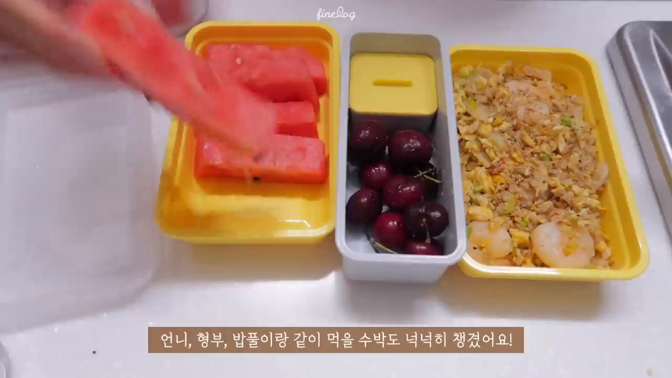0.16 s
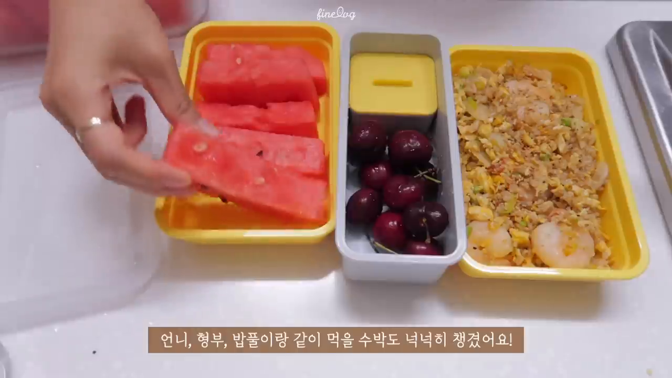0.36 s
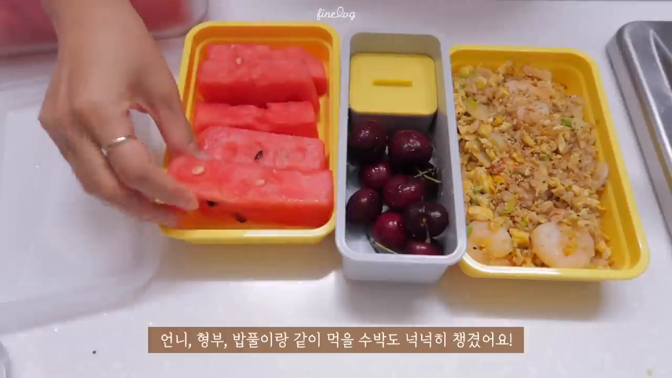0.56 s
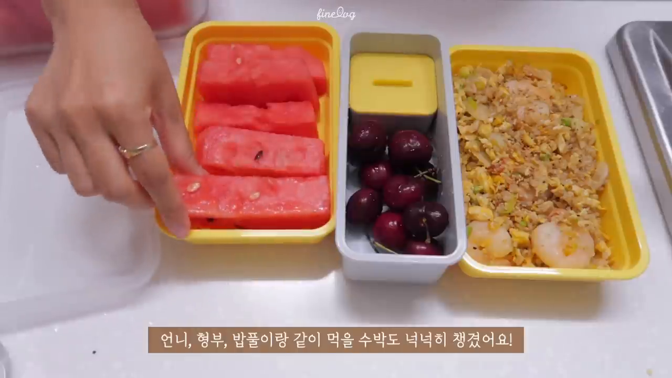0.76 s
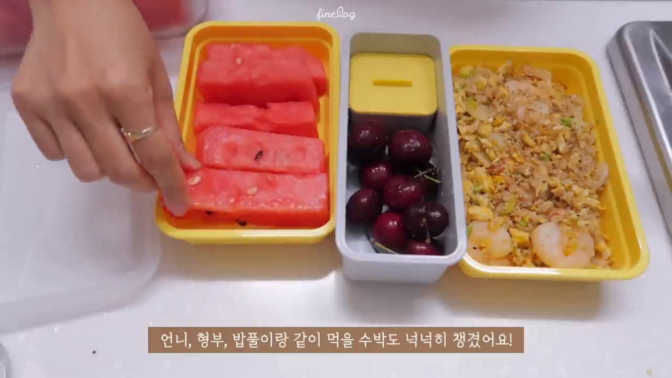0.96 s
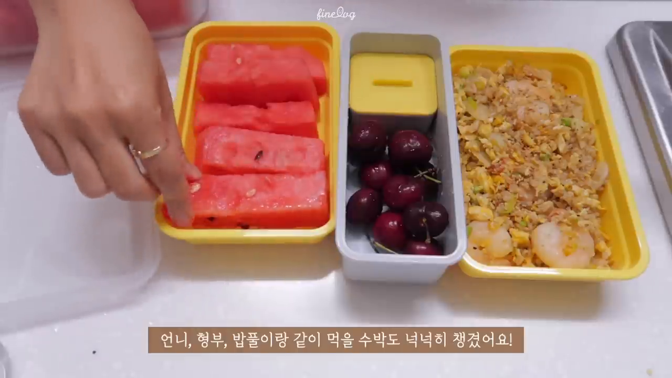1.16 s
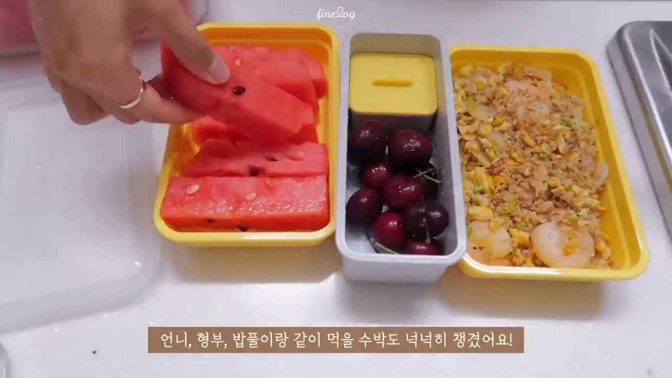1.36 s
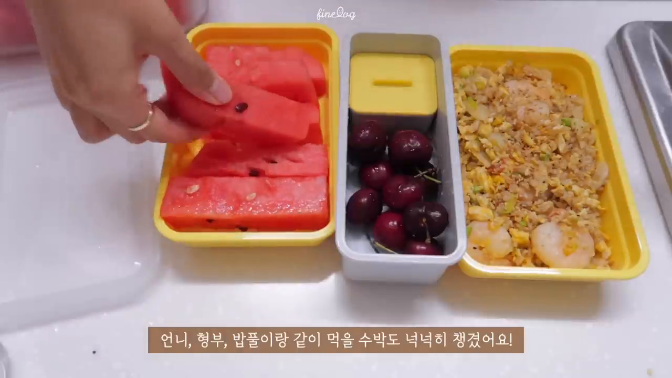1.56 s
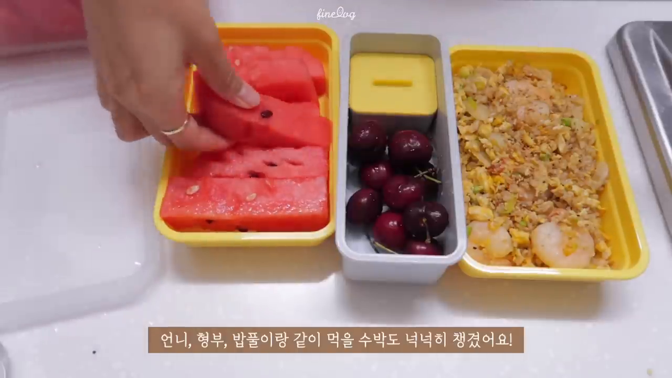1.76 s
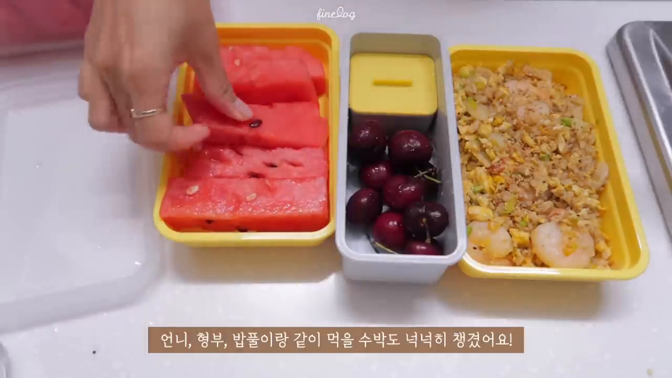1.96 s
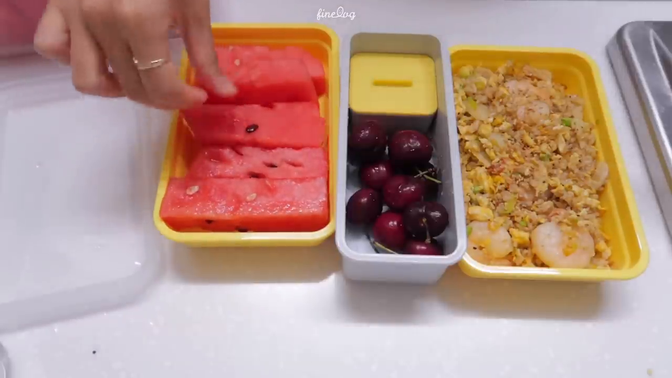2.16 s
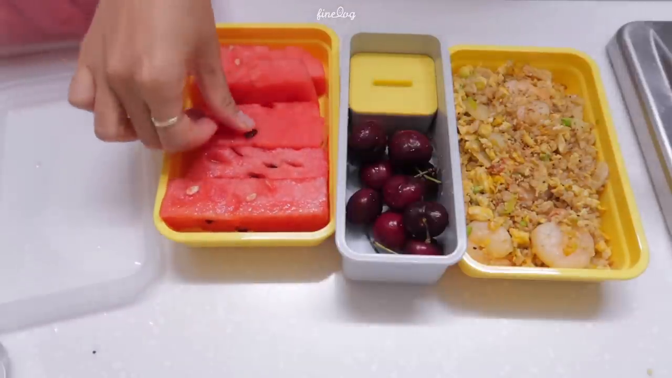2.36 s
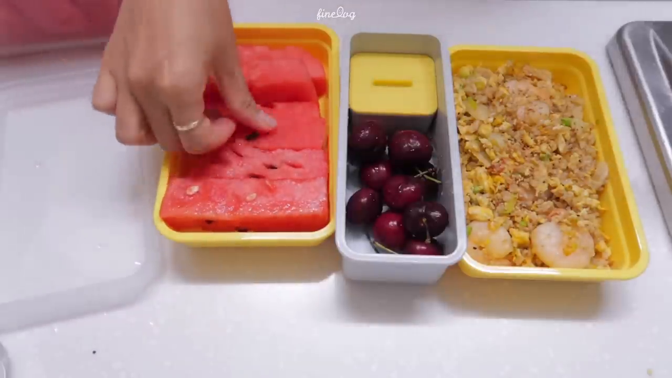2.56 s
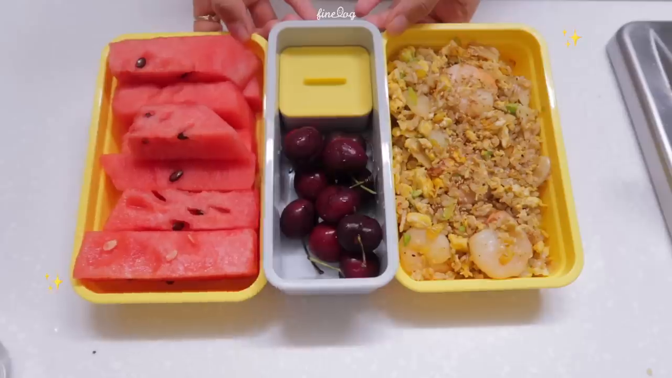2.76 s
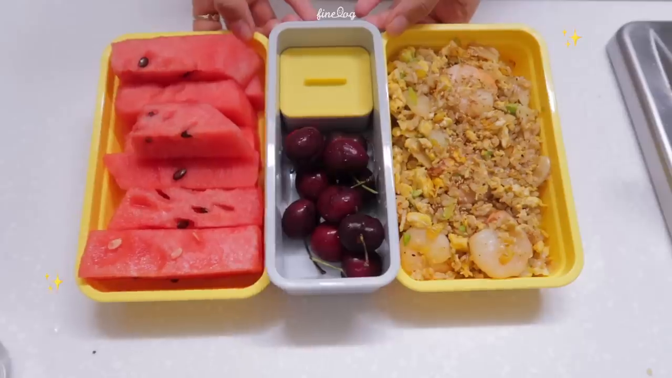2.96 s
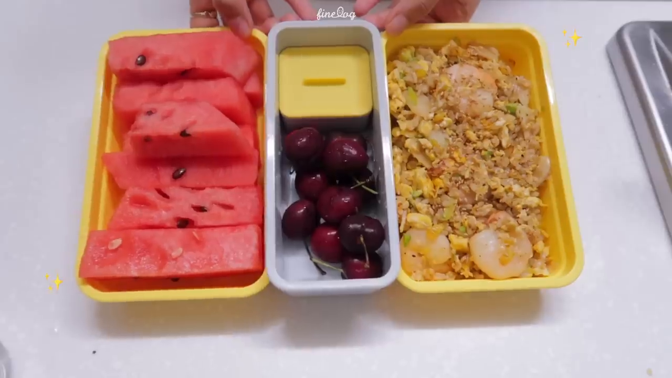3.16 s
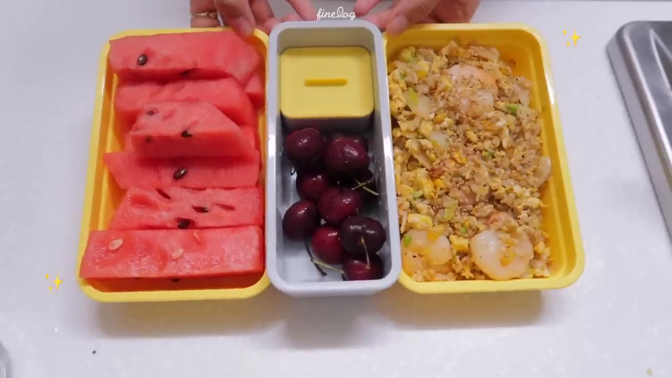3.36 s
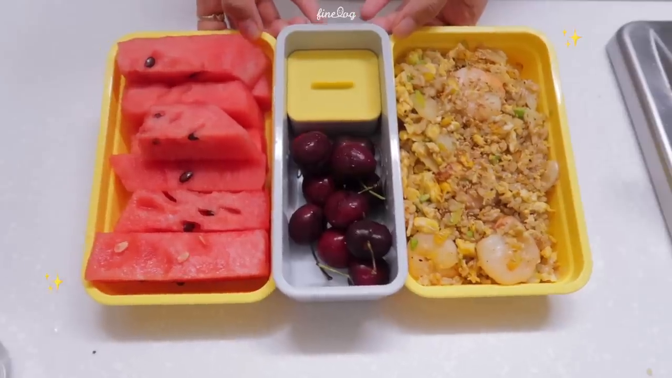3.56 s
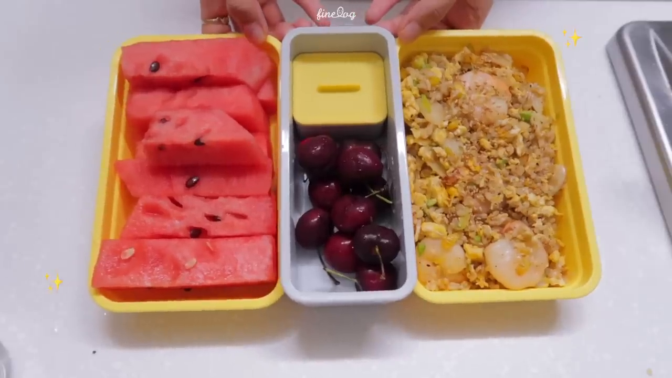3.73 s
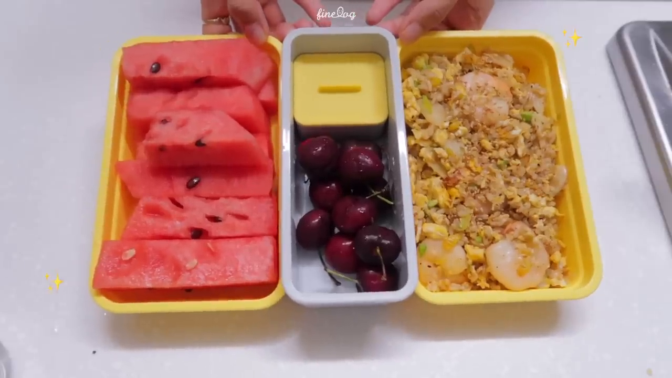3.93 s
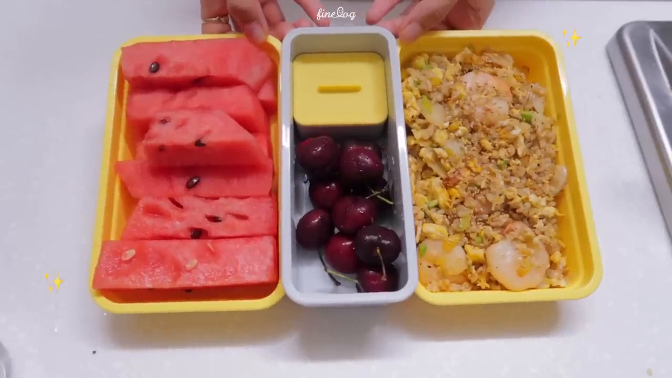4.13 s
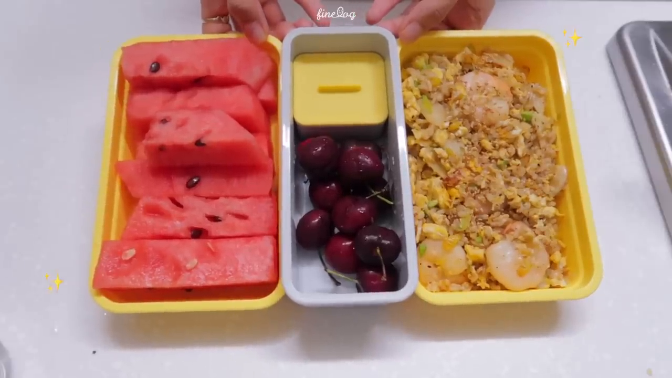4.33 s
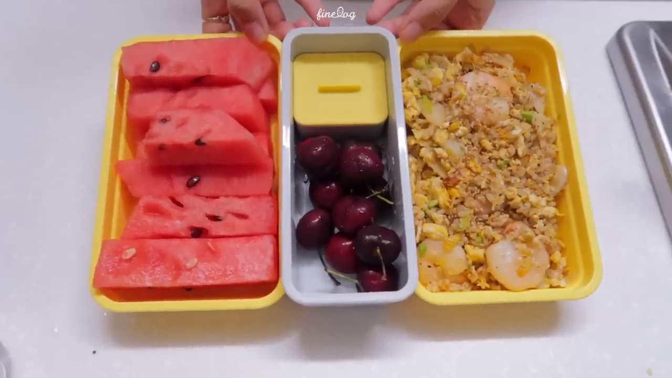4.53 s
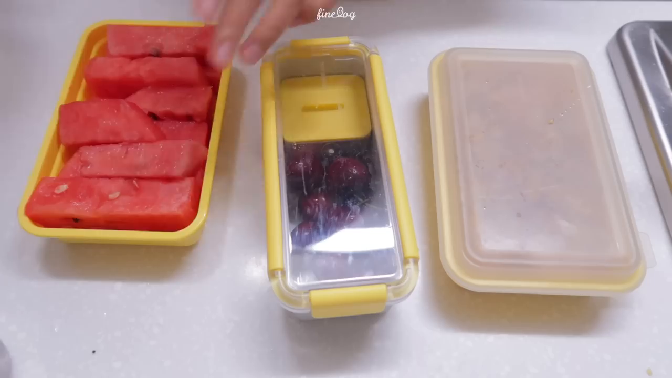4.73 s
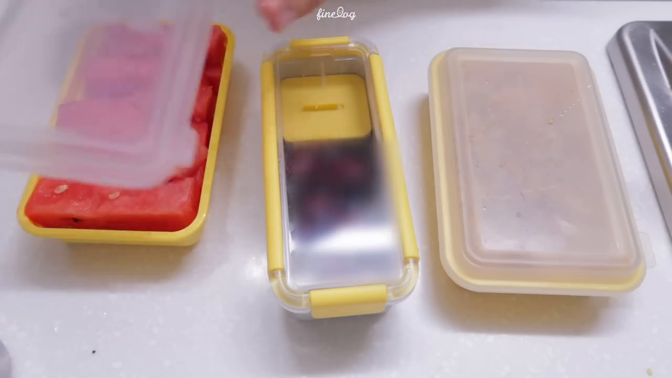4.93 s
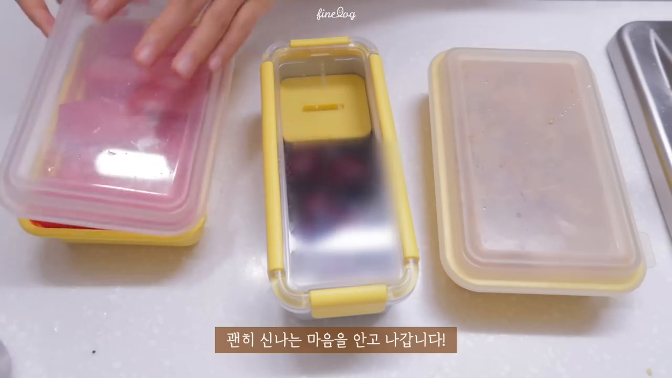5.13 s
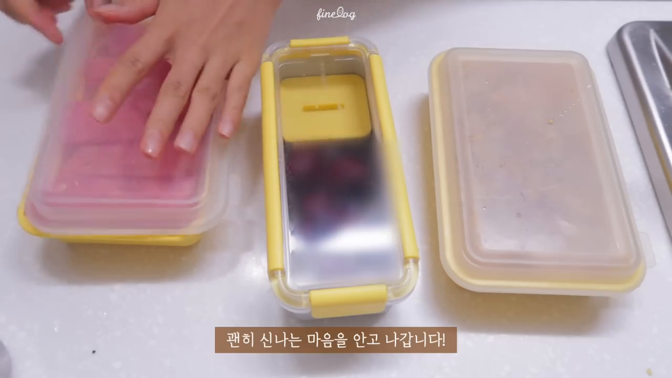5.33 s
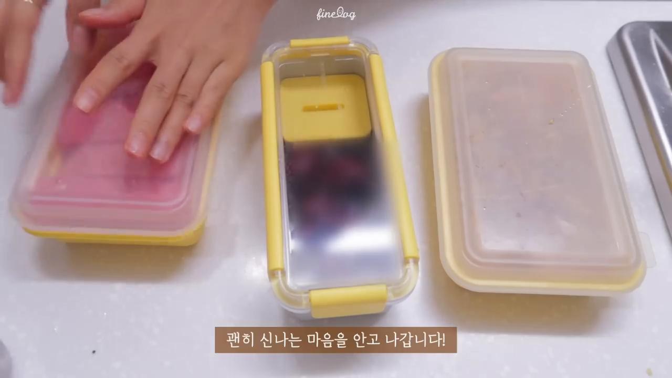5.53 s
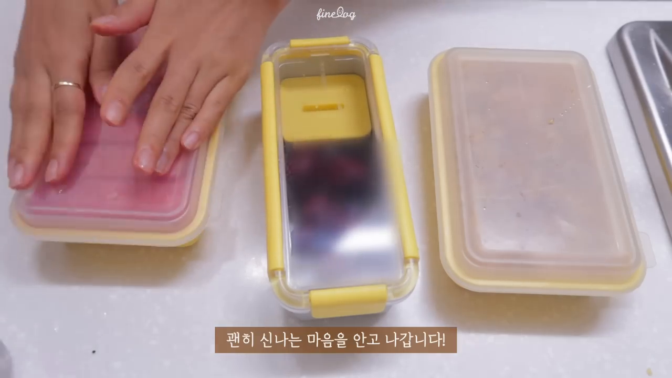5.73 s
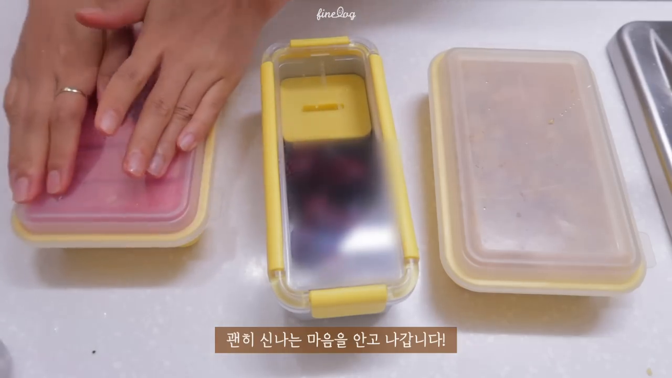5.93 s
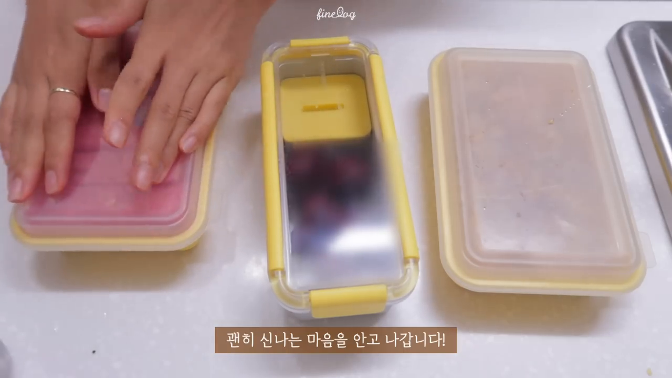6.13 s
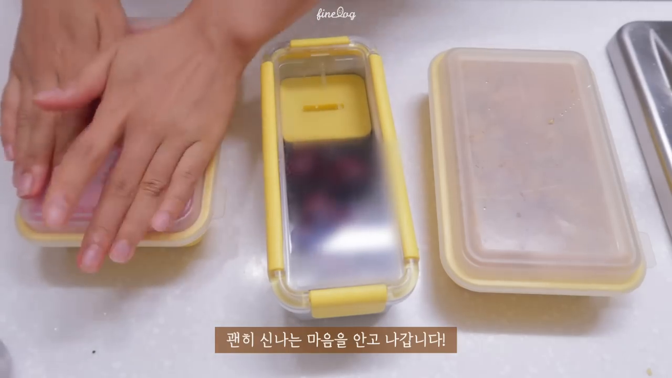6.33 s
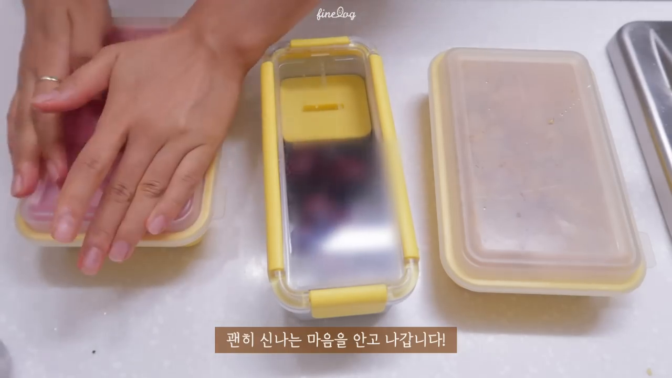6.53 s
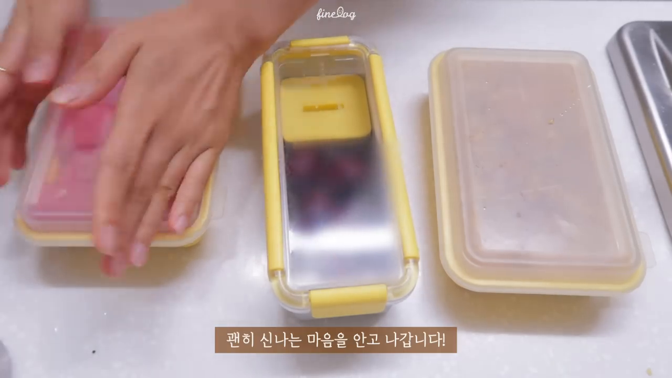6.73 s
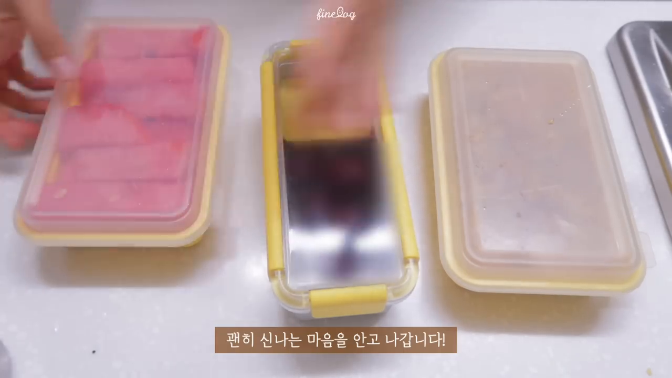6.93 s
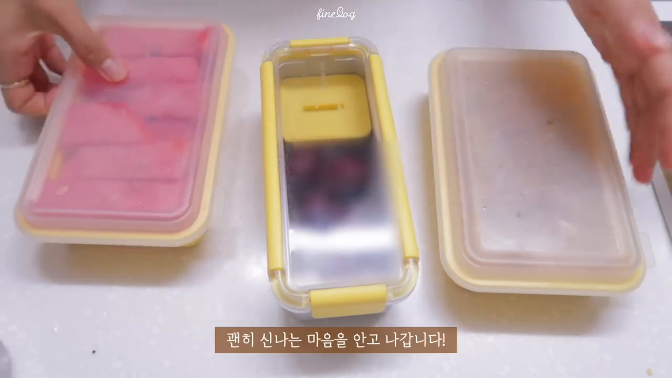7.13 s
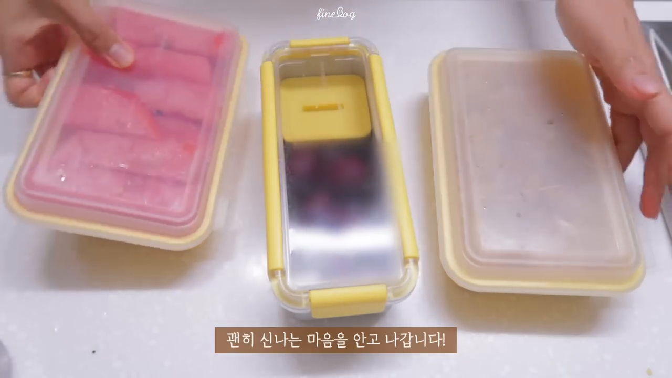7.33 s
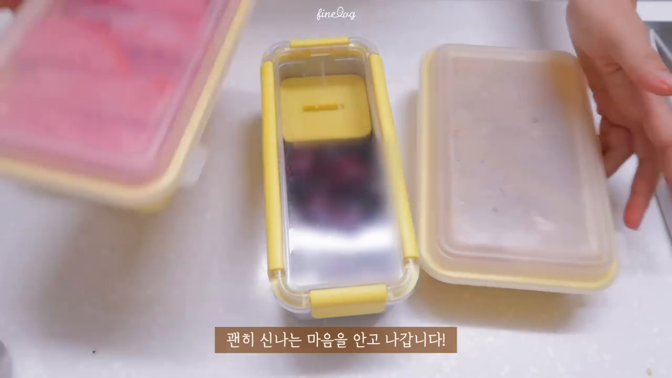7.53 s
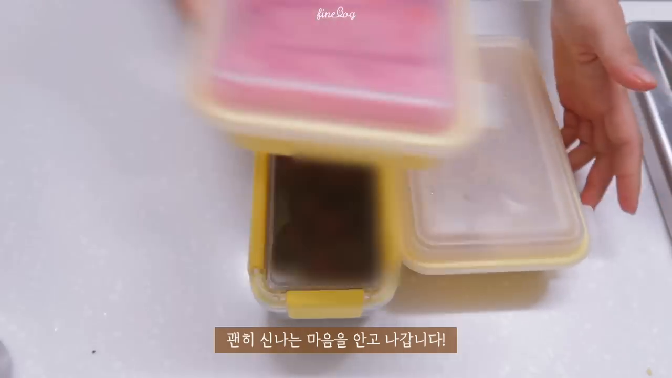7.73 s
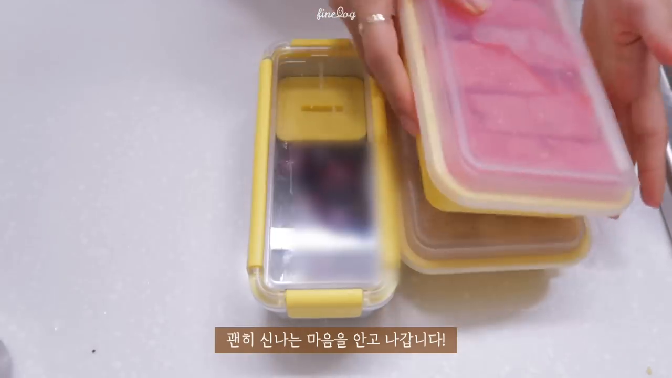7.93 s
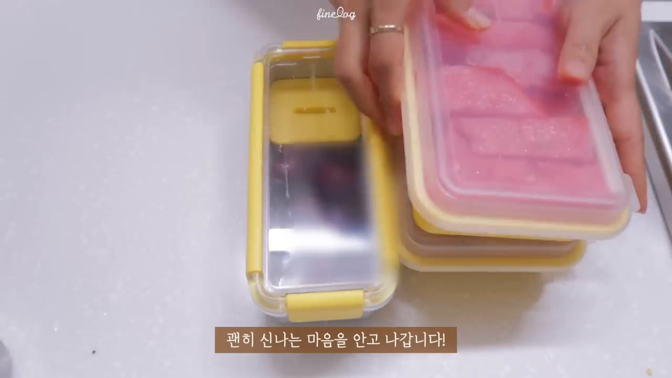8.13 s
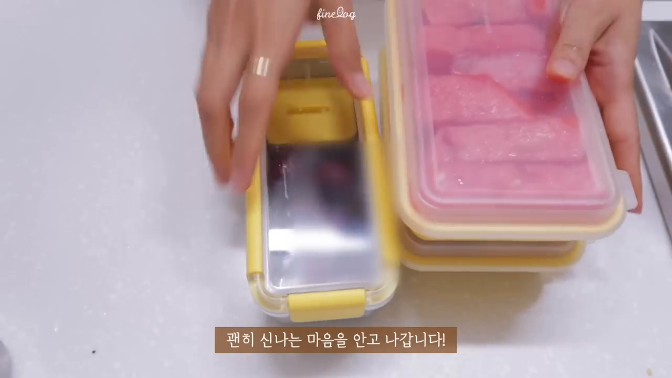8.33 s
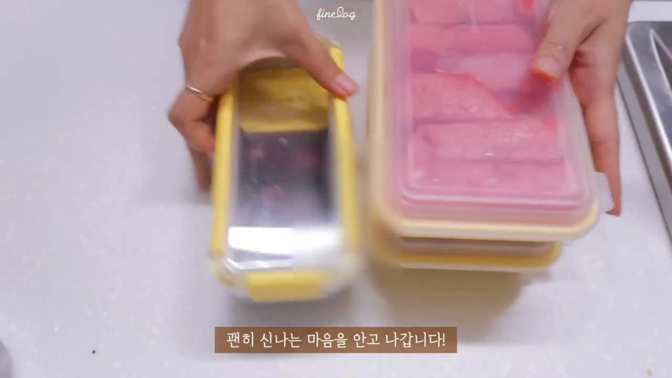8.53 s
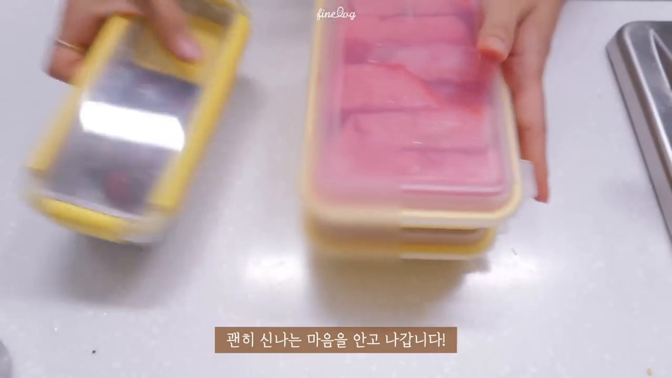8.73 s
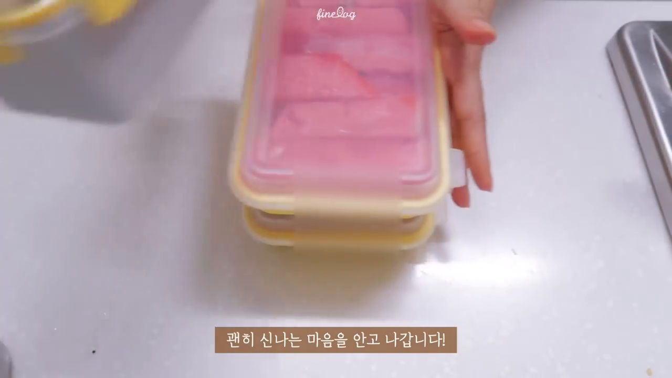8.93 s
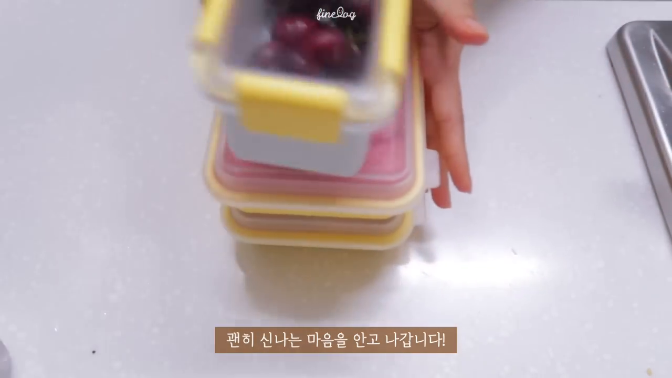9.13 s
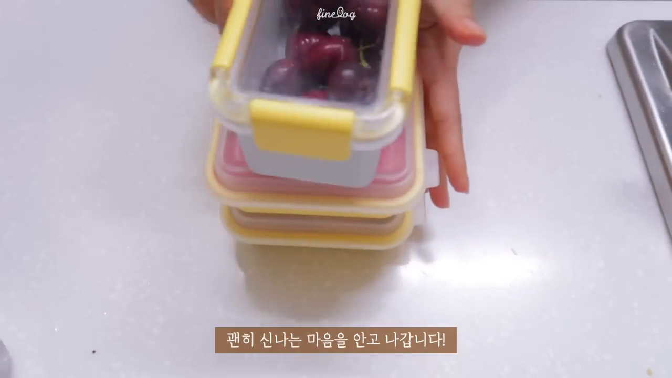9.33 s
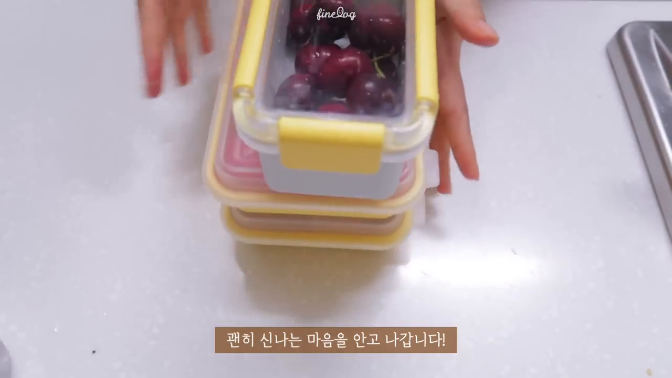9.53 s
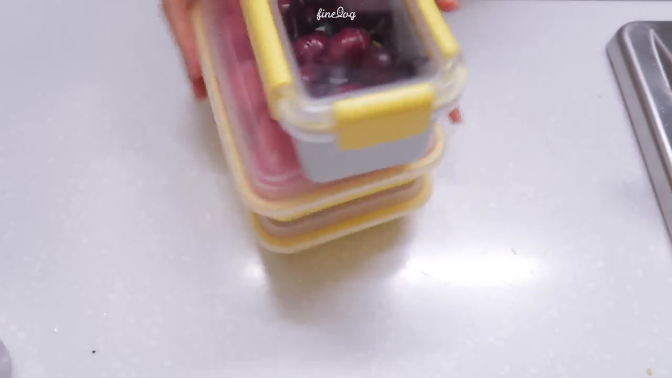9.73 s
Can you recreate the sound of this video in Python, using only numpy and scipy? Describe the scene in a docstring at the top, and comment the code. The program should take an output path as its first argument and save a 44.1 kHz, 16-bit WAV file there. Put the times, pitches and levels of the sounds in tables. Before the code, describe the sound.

Close kitchen counter: soft wet fruit touches in a plastic tray, then a lid clatters on, squeaks, and boxes knock together in a stack.

```python
"""A kitchen counter with plastic lunch boxes on it, heard up close in stereo. Wet melon slices are tucked into
a tray, a lid clatters on and squeaks as it is pressed home, then boxes are slid about and stacked.
Knocks are built from ringing modes, short noise and a rim crack; rubbing comes from many tiny random slips.
Squeals are gliding tones. Mains hum, a low ventilation rumble, a faint drone and hiss lie behind."""
import sys
import numpy as np
from scipy import signal
from scipy.fft import rfft, irfft, next_fast_len
from scipy.io import wavfile
from scipy.ndimage import uniform_filter1d, map_coordinates

SR = 44100
rng = np.random.default_rng(int(sys.argv[2]) if len(sys.argv) > 2 else 0)


def materialize(psi):
    """Save the field psi as 16-bit PCM at rate SR to the path in sys.argv[1].

    A 1-D psi becomes a single channel; in a 2-D psi each row is a channel.
    """
    bounded = np.clip(np.atleast_2d(psi).T, -1, 1)
    quanta = np.round(bounded * 32767).astype(np.int16)
    wavfile.write(sys.argv[1], SR, quanta)


N = 435708  # length of the scene in samples

# Plastic knocking on plastic. Each row: start in seconds, strength in dB, low thump in dB, hollow sound in dB,
# hardness in dB (raises the crack), pitch the thin wall favours in Hz.
CONTACTS = [(0.384, -39, -8, -9.5, 1.5, 2100), (0.5796, -24, -22, -12, -1, 1920),
            (0.749, -46, 2.5, 4.5, 1, 1360), (1.049, -38.5, -23, -12, 3.5, 2220),
            (1.355, -57, 6, -5, 10.5, 1920), (2.075, -39, -4, -2, 1.5, 1800),
            (2.092, -43, -8, -4, -3, 1950), (2.391, -50, -1, -2, 1, 1650), (2.613, -47, -9, -7, -5, 1940),
            (2.861, -34, -4.5, -2, 1.5, 1910), (5.131, -51, 7, 7.5, 8, 1450),
            (5.188, -22, -8, -3, -4.5, 1370), (5.2624, -19, -11, 2, 4, 1510),
            (5.2949, -23.5, -11, -4.5, 0, 1430), (5.314, -22.5, -13, -3, -13, 1420),
            (5.331, -32, -5.5, 1.5, -7, 1400), (5.419, -21, -11.5, 4, -7.5, 1260),
            (5.495, -40.5, -1, 4, -1, 1500), (5.613, -42.5, -3, -2, 1, 1400),
            (5.66, -34, -9, -1, -16, 1800), (5.683, -35, 2.5, 9.5, -6, 1450),
            (5.694, -29, -1.5, 5, -7, 1600), (5.701, -34, 1, 3, -10, 1800), (5.722, -31, -4, 0, -1.5, 1800),
            (5.727, -35, -2, -2, -5, 1950), (5.7887, -31, -0.5, 7, -5, 1500), (5.797, -37, 2, 2, -4, 1650),
            (5.833, -46.5, 8, 5, -2, 1500), (5.842, -40, 4, 4, -4, 1750), (5.868, -45, 1, 5, -12, 1700),
            (5.8754, -36.5, 5.5, 4, -14, 1480), (6.265, -54.5, 11, 3, -1, 1400),
            (6.331, -48, 11, 2, -11, 1600), (6.3985, -21, 2, 1.5, 4.5, 1780),
            (7.147, -29, -10, -6, 1.5, 2100), (7.1521, -24.5, 2.5, 4, -1.5, 1600),
            (7.393, -38.5, -0.5, 3.5, -5.5, 1400), (7.658, -39.5, 8, 6, -13, 1150),
            (7.669, -38, 10, 10, -4, 1150), (7.984, -12.5, -1.5, -7, -3.5, 1770),
            (8.1442, -31.5, 6, 0, -3, 1620), (8.2815, -17, -4, -3, -1.5, 1730),
            (8.6452, -35, -11, 6.5, -8, 1370), (8.771, -54, -3, 9, -10, 1300),
            (9.097, -53.5, -4, 15, -10, 1200), (9.108, -54, -5, 9, -12, 1210),
            (9.1749, -46, 4, 10, -15, 1204), (9.194, -37.5, 4, -3, -6, 1510),
            (9.207, -34, -3, -4, -5, 1750), (9.224, -14.5, -8, -6.5, 0, 2150),
            (9.231, -26.5, -2, -1, -8, 2000), (9.3252, -18, -4.5, 1.5, -1, 1400),
            (9.347, -32.5, -2, -1, 2.5, 1510), (9.498, -37, 5, 0.5, 2.5, 1760),
            (9.5201, -35.5, -2, 0, -11, 1250), (9.731, -44.5, -4.5, 0, -1, 1555),
            (9.76, -44.5, -6, -4.5, -2, 1720), (9.778, -40.5, -1, -6, -6, 1730),
            (9.825, -32, -0.5, -9, -8, 1600)]
# What the hands work on: open melon tray, lid dropped on, lid pressed home, one full box on another,
# small box on top. Each row: start in seconds, thump pitch in Hz, hollow pitch in Hz, wall focus in dB per octave,
# wall chatter in dB, damping by hands and load in dB per second, room echo in dB,
# left over right in dB, left lead in microseconds.
STAGES = [(0, 170, 640, 8, -6, 0, -11.5, 0, 20), (4.8, 288, 830, 12, -6.5, 89, -11.5, 1, 17),
          (5.55, 295, 820, 11, -7, 300, -11, 0.8, 25), (7.85, 296, 690, 5, -7, 40, -12.5, -1, 30),
          (8.55, 342, 787, 11, -2, 78, -15, 0.5, 29)]
# Ways each object rings. Each row: pitch in Hz, level in dB, seconds to fade by 60 dB.
TRAY_MODES = [(136, -3, 0.075), (278, -1.5, 0.052), (615, -3, 0.035), (843, -4, 0.032), (1050, -9.5, 0.049),
              (1370, -2.5, 0.035), (1551, 3, 0.034), (1952, -9, 0.052), (2250, -4, 0.045),
              (2395, -1.5, 0.028), (2642, 0.5, 0.024), (3250, 2, 0.028), (3500, -1, 0.022), (4100, 0, .018),
              (5650, -22, .02)]
LID_MODES = [(100, -8, 0.11), (271, -2.5, 0.045), (440, -3.5, 0.046), (601, -13, 0.047), (764, -2, 0.041),
             (871, -0.5, 0.035), (993, -3, 0.033), (1275, -1, 0.036), (1400, -3.5, 0.035),
             (1670, -0.5, 0.019), (1995, -4.5, 0.027), (2217, -3.5, 0.025), (3340, -1, 0.018),
             (3960, -3, 0.0098), (4640, -1, 0.016)]
STACK_MODES = [(87.4, -2.5, 0.13), (216.3, -1.5, 0.13), (291, 1, 0.044), (386, -2.5, 0.052),
               (625, -2, 0.07), (782, 0.5, 0.032), (893, -5, 0.038), (1275, 2.5, 0.024), (1556, -13, 0.06),
               (1836, -4.5, 0.028), (1995, -5, 0.02), (2125, 0, 0.02), (2690, -12, 0.015),
               (3480, -7.5, 0.018), (4490, 0, 0.022), (5270, 0.5, 0.018)]  # two full boxes, one on the other
SMALL_BOX_MODES = [(106, -3, 0.11), (233, -3, 0.073), (422, -2, 0.045), (647, -7, 0.047), (843, 1, 0.025),
                   (1354, 1.5, 0.025), (1525, -4.5, 0.033), (1844, -0.5, 0.024), (2126, -0.5, 0.016),
                   (2310, -2.5, 0.019), (2710, 0, 0.019), (3280, 1, 0.014), (3950, -7, 0.022),
                   (7170, -5, .015)]
# The rim's crack. Each row: frequency in Hz, relative level in dB.
CRACK_SPECTRUM = [(1800, -31), (2800, -2), (3800, 2.5), (5400, -4), (7500, -10.5), (10000, -14),
                  (13000, -18), (16000, -38)]
# The load settling with a dull thud. Each row: start in seconds, level in dB, pitch in Hz.
THUDS = [(5.832, -34.5, 151), (5.876, -35, 189), (7.151, -28.5, 205), (7.671, -25.5, 165),
         (8.02, -26.5, 570), (8.338, -28, 200), (8.335, -32.5, 90), (8.4479, -35.5, 100), (8.73, -40, 134),
         (8.905, -43, 230), (9.243, -26.5, 178), (9.345, -25, 141)]
# Plastic that sticks and slips. Each row: start of full level in seconds, level in dB, pitch in Hz there,
# glide in octaves per second, attack in seconds, hold in seconds, release in seconds.
SQUEALS = [(7.11, -16, 2076, 2, .016, 0.009, 0.014), (7.663, -25, 1270, -1.48, .008, 0.0064, 0.007),
           (8.65, -29.5, 930, -2, .006, 0.019, 0.023), (8.686, -37.5, 654, -2.5, .012, 0.024, 0.013)]
# Boxes dragged along the counter and over each other. Each row: start in seconds, length in seconds,
# wall level in dB, hollow over wall in dB, hiss over wall in dB.
DRAGS = [(3.59, 0.16, -63.5, 7, -18), (5.68, 0.18, -52, 6, -9), (7.666, 0.026, -48.5, 12, -20),
         (8.535, 0.4, -54.5, 3.5, -2), (8.653, 0.03, -46, 5, -2.5), (8.902, 0.02, -47.5, -5, -4),
         (9.006, 0.066, -57, -5, -2), (9.722, 0.23, -55.5, 1, -4.5), (9.797, 0.017, -49.5, 9, -8)]
# Fruit and fingers brushing plastic. Each row: centre in seconds, time from centre to about a seventh
# of the peak in seconds, level in dB, kind of touch.
STROKES = [(0.243, 0.032, -50, "squeaky"), (0.354, 0.11, -64, "wet"), (0.522, 0.04, -56, "wet"),
           (1.107, 0.13, -60.5, "wet"), (1.242, 0.028, -49.5, "dull"), (1.562, 0.057, -54.5, "squeaky"),
           (1.66, 0.029, -53.5, "wet"), (1.69, 0.18, -59.5, "wet"), (1.786, 0.018, -48.5, "wet"),
           (1.817, .015, -50, "wet"), (1.903, 0.022, -57, "wet"), (1.965, 0.026, -56.5, "wet"),
           (2.398, 0.031, -50, "wet"), (2.603, 0.022, -48.5, "wet"), (2.834, 0.014, -52, "dull"),
           (3.26, 0.015, -50, "dull"), (3.3, .012, -52, "dull"), (4.266, 0.016, -42, "squeaky"),
           (5.04, 0.018, -47.5, "dull"), (5.692, 0.074, -45.5, "dull"), (5.845, 0.037, -47, "dull"),
           (6.035, 0.022, -44.5, "dull"), (6.203, 0.046, -57, "hissy"), (6.396, .004, -33.5, "dull"),
           (6.767, 0.09, -58, "hissy"), (7.043, 0.029, -51.5, "dull"), (7.315, 0.15, -54, "hissy"),
           (7.662, 0.16, -52.5, "hissy"), (7.667, 0.008, -42, "squeaky"), (8.16, 0.22, -47.5, "dull"),
           (8.678, 0.1, -47, "swish"), (8.931, 0.021, -43.5, "swish"), (8.938, .003, -43, "swish"),
           (9.05, 0.011, -49, "hissy")]
# For each kind of touch, the level in dB of each kind of friction.
TOUCH_MIX = {"wet": {"rub": -8, "crackle": -1.9, "hiss": -3.5, "squeak": -4}, "squeaky": {"rub": -6.5,
             "squeak": 0, "hiss": -15.5}, "hissy": {"rub": 0, "hiss": -5}, "dull": {"rub": 0, "hiss":
             -14.5}, "swish": {"rub": -1, "hiss": -5.5, "sheen": -8}}
# What rubbing excites: the hollow, the walls, and a smooth rim brushing past.
# Each row: pitch in Hz, width in Hz, level in dB.
DRAG_HOLLOW = [(578, 86, -6.5), (778, 47, 1.5), (924, 75, -4.5), (1040, 67, -3)]
SQUEAK_WALL = [(1460, 160, -10), (1810, 130, -4), (2090, 230, 0), (2330, 150, -5), (2760, 140, -5),
               (3080, 120, -13)]
SHEEN = [(3770, 500, -9), (4700, 400, 3), (5270, 450, -2)]
# Tone colours of friction. Each row: frequency in Hz, relative level in dB.
RUB_SPECTRUM = [(250, -23), (700, 7.5), (1100, 9), (1600, 10), (2200, 4), (2900, -8.5), (4500, -52)]
HISS_SPECTRUM = [(1800, -1.5), (3000, 2.5), (5000, -2.5), (7500, -10), (11000, -10), (14000, -17),
                 (16000, -22)]
# How long the room's echo lasts. Each row: frequency in Hz, seconds to fade by 60 dB.
ROOM_FADE = [(80, 0.52), (250, 0.2), (700, 0.32), (1600, 0.25), (2700, 0.19), (5000, 0.19), (12000, 0.097)]
# Tone colour of the echo. Each row: frequency in Hz, relative level in dB.
ROOM_COLOUR = [(60, 9.5), (200, -1.5), (500, -0.5), (1500, 0), (4000, 3.5), (12000, 1.5)]
# Mains hum and faint motor lines. Each row: pitch in Hz, level in dB.
HUM = [(59.2, -46), (188.4, -60), (565.2, -67), (1168, -70)]
# A faint far-off drone. Each row: start of full level in seconds, hold in seconds, pitch in Hz, level in dB.
DRONE = [(0.32, 0.42, 150, -48), (0.14, 0.074, 187, -52), (0.13, 0.05, 228, -58.5),
         (0.13, 0.08, 335, -55.5)]
# Colours of the low rumble and the hiss of the air. Each row: frequency in Hz, relative level in dB.
RUMBLE_SPECTRUM = [(22, -20), (36, 2.5), (45, 6.5), (58, -6), (90, 2), (130, -1), (200, -4.5), (300, -13.5),
                   (500, -22.5), (1000, -64)]
AIR_SPECTRUM = [(15, -47), (25, -24), (42, -7), (70, -4.5), (85, -17), (186, -15), (271, -19.5), (573, -22),
                (700, -24), (1180, -28.5), (2300, -33), (6200, -42.5), (12200, -52), (13500, -57),
                (15000, -73)]
# How the rumble comes and goes. Each row: time in seconds, level in dB.
RUMBLE_LEVEL = [(0, -51), (.4, -46), (1, -53), (3.8, -47), (4.6, -52), (6.8, -52.5), (9.88, -59)]
# How alike left and right hear the air. Each row: frequency in Hz, likeness from 0 to 1.
ALIKE = [(60, .9999), (250, 0.34), (1000, 0.17), (2500, 0.12), (5000, 0.097), (12000, 0.027)]

CRACK_DB = -13.5  # crack against the wall's ring, at hardness 0
CRACK_SCATTER_DB = -9.5  # extra crack, opposite in left and right, against the main crack
MODE_LUCK_DB, MODE_DETUNE = 1.5, 0.0093  # random change of each mode's level (dB) and pitch (share) per blow
THUD_RISE_S = 0.0019
SKID_S, SKID_LENGTH_S, SKID_DB = 7.076, 0.075, -39  # the lid's rim skidding into its seat
SKID_GROWTH_DB, SKID_HOLLOW_DB = 4.5, -2.5
SKID_PUSH_DB, SKID_PUSH_S = 16.5, 0.012  # extra push halfway through; S is half the swell's length setting
DRAG_ATTACK_S, DRAG_RELEASE_S = 0.015, 0.075  # time to swell or fade by 20 dB
JUICE_HZ, JUICE_OCTAVES, JUICE_CYCLES = 2100, 0.555, 2.1  # juice pops: middle pitch, scatter, life in cycles
DRONE_RELEASE_S = 1.56  # time for a drone tone to fade by 20 dB
TOP_HZ = 15750


def contacts():
    """Each contact thumps the loaded base, sounds the hollow, rings the thin walls and cracks at the rim."""
    direct, echo = np.zeros(N), np.zeros((2, N))
    t = np.arange(SR // 7) / SR
    rim = causal(CRACK_SPECTRUM)
    for s, db, weight_db, hollow_db, hardness_db, wall_hz in CONTACTS:
        thump_hz, hollow_hz, wall_focus_db, chatter_db, damping, wet_db, _, _ = stage(s)
        modes = modes_at(s)
        crack_db = CRACK_DB + hardness_db
        thump = register(t, modes, 66, 540, thump_hz, focus_db=4.0, rattle_db=-5, t60=0.16)
        hollow = register(t, modes, 520, 1224, hollow_hz, focus_db=4.0, rattle_db=-7.5, t60=0.13)
        # stiffer spots give shorter contacts that reach higher
        reach_hz = 2600 * (wall_hz / 1500) ** .7
        wall = register(t, modes, 1080, reach_hz, wall_hz, focus_db=wall_focus_db, rattle_db=chatter_db, t60=0.057)
        high_ring = ring(t, modes, 2900, 8000, 2500, focus_db=2.0)
        crack = strength(snap(t, rim) + amp(-6.0) * high_ring)
        body = amp(weight_db) * thump + amp(hollow_db) * hollow + wall
        body = body * amp(-abs(damping) * t)
        # a dull contact builds up more slowly
        dullness_db = max(weight_db, hollow_db, 0) - crack_db
        rise = 1 - np.exp(-t / (.00009 * amp(0.75 * dullness_db)))
        blow = amp(db) * (rise * body + amp(crack_db) * crack)
        add(direct, s, blow)
        add(echo, s, room(blow, wet_db))
        scatter = amp(db + crack_db + CRACK_SCATTER_DB) * snap(t, rim)
        add(echo, s, np.outer([1, -1], scatter))
    return direct, echo


def snap(t, rim):
    """The rim's crack: a click and brief noise given the rim's tone colour."""
    burst = rattle(t, t60=0.039, click=0.62)
    return strength(signal.fftconvolve(burst, rim)[:len(t)])


def register(t, modes, lo_hz, hi_hz, pitch_hz, focus_db, rattle_db, t60):
    """Ringing modes and chatter of one part of the box."""
    band = signal.butter(4, [lo_hz, hi_hz], "band", fs=SR, output="sos")
    chatter = strength(signal.sosfilt(band, rattle(t, t60, click=0.66)))
    return strength(ring(t, modes, lo_hz, hi_hz, pitch_hz, focus_db) + amp(rattle_db) * chatter)


def ring(t, modes, lo_hz, hi_hz, pitch_hz, focus_db):
    """A box's modes in one pitch range; the place of contact favours those near a pitch."""
    hz, db, t60 = np.transpose(modes)
    luck, detune, sign = rng.standard_normal((3, len(modes)))
    distance = np.abs(np.log2(hz / pitch_hz))  # in octaves
    weight = amp(db + MODE_LUCK_DB * luck - focus_db * distance)
    heard = (hz > lo_hz) & (hz < hi_hz)
    actual_hz = (hz * (1 + MODE_DETUNE * detune))[heard, None]
    waves = np.sin(2 * np.pi * actual_hz * t) * amp(-60 * t / t60[heard, None])
    return strength((weight * np.sign(sign))[heard] @ waves)


def rattle(t, t60, click):
    """A click followed by the dense, quickly dying chatter of small modes, made from fading noise."""
    chatter = strength(rng.standard_normal(len(t)) * amp(-60 * t / t60))
    return chatter + click * strength(1.0 * (t == 0))


def thuds():
    """A settling load moves only the base's low modes, and softly."""
    out, t = np.zeros(N), np.arange(SR // 5) / SR
    for s, db, hz in THUDS:
        base = register(t, modes_at(s), 59, 1.8 * hz, hz, focus_db=14, rattle_db=-3.5, t60=0.15)
        rise = 1 - np.exp(-t / THUD_RISE_S)
        add(out, s, amp(db) * rise * base)
    return out


def squeak():
    """The rim skids in quick irregular slips as the lid is pushed down."""
    progress = np.clip((np.arange(N) / SR - SKID_S) / SKID_LENGTH_S, 0, 1)
    push = swell(SKID_S + SKID_LENGTH_S / 2, 2 * SKID_PUSH_S)
    push_db = SKID_GROWTH_DB * progress + SKID_PUSH_DB * push
    pressure = amp(SKID_DB + push_db) * envelope(SKID_S, attack=0.0027, hold=SKID_LENGTH_S, release=0.016)
    slips = grains(rate=5400, spread_db=2.0)
    walls = resonated(slips, SQUEAK_WALL)
    rub = amp(-5.0) * coloured(slips, RUB_SPECTRUM)
    hiss = amp(-29) * coloured(slips, HISS_SPECTRUM)
    hollow = amp(SKID_HOLLOW_DB) * resonated(slips, DRAG_HOLLOW)
    return pressure * (hollow + walls + rub + hiss)


def squeals(waver=0.15, rough_db=4):
    """Slips lock on to a wall's bending tone, which glides and wavers."""
    out, t = np.zeros(N), np.arange(N) / SR
    for s, db, pitch_hz, glide, attack, hold, release in SQUEALS:
        hz = pitch_hz * 2 ** (glide * np.clip(t - s, -2 * attack, hold + release))
        phase = 2 * np.pi * np.cumsum(hz * (1 + waver * wobble(700))) / SR
        tone = unit(amp(rough_db * wobble(400)) * np.sin(phase))
        out += amp(db) * envelope(s, attack, hold, release) * tone
    return out


def slide():
    """A dragged base catches on the counter's grain, which sounds its hollow and walls."""
    slips = grains(rate=5000, spread_db=2) * amp(1.5 * wobble(70) + 1.2 * wobble(22))
    walls = unit(coloured(slips, RUB_SPECTRUM) + amp(-14) * resonated(slips, SQUEAK_WALL))
    hollow = resonated(slips, DRAG_HOLLOW)
    hiss = coloured(slips, HISS_SPECTRUM)
    out = np.zeros(N)
    for s, length, db, hollow_db, hiss_db in DRAGS:
        drag = walls + amp(hollow_db) * hollow + amp(hiss_db) * hiss
        out += amp(db) * envelope(s, DRAG_ATTACK_S, length, DRAG_RELEASE_S) * drag
    return out


def strokes(flutter_db=3.0):
    """Wet fruit and fingertips brush the plastic in short grainy swells."""
    slips = grains(rate=2500, spread_db=2.5) * amp(flutter_db * wobble(90))
    friction = {
        "rub": unit(coloured(slips, RUB_SPECTRUM) + amp(-19.0) * resonated(slips, SQUEAK_WALL)),
        "crackle": crackle(),
        "hiss": coloured(slips, HISS_SPECTRUM),
        "squeak": chirps(),
        "sheen": resonated(slips, SHEEN),
    }
    texture = {touch: sum(amp(db) * friction[kind] for kind, db in mix.items())
               for touch, mix in TOUCH_MIX.items()}
    return sum(amp(db) * swell(s, length) * texture[touch] for s, length, db, touch in STROKES)


def crackle(count=4500, size=256):
    """Films of juice break at random moments, each with its own brief pitch."""
    when = rng.integers(N, size=(count, 1))
    pitch, loudness = rng.standard_normal((2, count, 1))
    hz = np.minimum(JUICE_HZ * 2 ** (JUICE_OCTAVES * pitch), SR / 4)
    cycles = hz * np.arange(size) / SR
    pops = amp(2.7 * loudness) * np.sin(2 * np.pi * cycles) * np.exp(-cycles / JUICE_CYCLES)
    return scattered(when, pops)


def chirps(count=2600, size=512, pitch_hz=1800, octaves=0.274, glide=0.099):
    """Wet skin and fruit stick and slip on plastic in tiny gliding squeaks."""
    when = rng.integers(N, size=(count, 1))
    pitch, bend, loudness = rng.standard_normal((3, count, 1))
    age = np.arange(size) / size  # 0 to 1 over each squeak
    hz = pitch_hz * 2 ** (octaves * pitch + glide * bend * age)
    phase = 2 * np.pi * np.cumsum(hz, axis=1) / SR
    squeaks = amp(2.5 * loudness) * np.sin(phase) * np.sqrt(age) * (1 - age) ** 2
    return scattered(when, squeaks)


def room(x, wet_db, width=0.18):
    """The kitchen's answer in two channels: noise in which each frequency dies at its own speed."""
    hz, t, z = signal.stft(rng.standard_normal((2, SR // 2)), SR, nperseg=256)
    fade_db = -60 * t / along(ROOM_FADE, hz)[:, None]
    z = z * amp(along(ROOM_COLOUR, hz)[:, None] + fade_db)
    # close ports hear the bass alike
    z[1] *= np.clip(width * np.sqrt(hz / 1200), 0, 1)[:, None]
    mid, side = signal.istft(z, SR, nperseg=256)[1]
    onset = 1 - np.exp(-np.arange(len(mid)) / SR / 0.0013)
    tail = np.array([mid + side, mid - side]) * onset
    return amp(wet_db) * signal.fftconvolve(x[None], tail / np.linalg.norm(mid), axes=1)


def placed(x):
    """Small left-right differences in level and arrival time give what is handled its place."""
    balance_db, lead_us = uniform_filter1d(stage(np.arange(N) / SR)[-2:], size=SR // 10)
    lead = lead_us * SR / 1e6  # in samples
    return np.array([amp(side * balance_db) * map_coordinates(x, [np.arange(N) + side * lead])
                     for side in (.5, -.5)])


def background():
    """Mains hum with faint motor lines, a wandering rumble, a fading drone and even hiss."""
    t = np.arange(N) / SR

    def tone(hz, drift):
        """A sine at rms 1 whose phase drifts a little."""
        return np.sqrt(2) * np.sin(2 * np.pi * hz * t + drift * wobble(4))

    hum = sum(amp(db + 0.53 * wobble(3.5)) * tone(hz, 0.22 * np.sqrt(hz / HUM[0][0])) for hz, db in HUM)
    drone = sum(amp(db + 2.7 * wobble(5.2)) * envelope(s, 0.1, hold, DRONE_RELEASE_S) * tone(hz, hz / 130)
                for s, hold, hz, db in DRONE)
    rumble_s, rumble_db = np.transpose(RUMBLE_LEVEL)
    rumble = amp(np.interp(t, rumble_s, rumble_db)) * coloured(rng.standard_normal(N), RUMBLE_SPECTRUM)

    def air_response(hz):
        """Share the air noise between middle and sides to set how alike left and right are."""
        turn = np.arccos(np.clip(along(ALIKE, hz), -1, 1)) / 2
        return amp(along(AIR_SPECTRUM, hz)) * [np.cos(turn), np.sin(turn)]

    mid, side = filtered(rng.standard_normal((2, N)), air_response)
    air = amp(-48.5) * unit(np.array([mid + side, mid - side]))
    return hum + drone + rumble + air


def turn_at(s):
    """Which of the stages is under way at time s."""
    return np.searchsorted([row[0] for row in STAGES[1:]], s)


def stage(s):
    """The settings of what is being handled at time s."""
    return np.array(STAGES)[turn_at(s), 1:].T


def modes_at(s):
    """The modes of what is being handled at time s."""
    return (TRAY_MODES, LID_MODES, LID_MODES, STACK_MODES, SMALL_BOX_MODES)[turn_at(s)]


def grains(rate, spread_db):
    """Tiny slips at random moments, of widely varied size; rate is slips per second."""
    happens = rng.random(N) < rate / SR
    return happens * rng.standard_normal(N) * amp(spread_db * rng.standard_normal(N))


def scattered(when, sounds):
    """Lay many short sounds at their start samples, at rms 1 overall."""
    places = when + np.arange(sounds.shape[1])
    return unit(np.bincount(places.ravel(), sounds.ravel(), N)[:N])


def envelope(start, attack, hold, release):
    """Gain that is full from start for hold seconds; attack and release each span 20 dB."""
    t = np.arange(N) / SR - start
    return amp(-20 * np.clip(np.maximum(-t / attack, (t - hold) / release), 0, 10))


def swell(centre, length):
    """A bell-shaped rise and fall, down to about a seventh at length seconds from the centre."""
    return np.exp(-2 * np.minimum(((np.arange(N) / SR - centre) / length) ** 2, 20))


def wobble(rate):
    """A smooth random curve through rate random points a second."""
    return map_coordinates(rng.standard_normal(int(N * rate / SR) + 4), [np.arange(N) * rate / SR])


def amp(db):
    """Decibels to gain."""
    return 10 ** (np.asarray(db) / 20)


def unit(x):
    """Scale to rms 1."""
    return x / np.sqrt(np.mean(x ** 2) + 1e-20)


def strength(x):
    """Scale a blow so that its first 20 ms have rms 1."""
    return x / np.sqrt(np.mean(x[:SR // 50] ** 2) + 1e-20)


def along(points, hz):
    """Read a curve of (Hz, value) points, with pitch on a log axis."""
    f, v = np.transpose(points)
    return np.interp(np.log(hz + 1), np.log(f + 1), v)


def filtered(x, response):
    """Change the level and phase of each frequency in x by a response."""
    n = x.shape[-1]
    m = next_fast_len(n + 8192)
    return irfft(rfft(x, m) * response(np.fft.rfftfreq(m, 1 / SR)), m)[..., :n]


def coloured(x, spectrum):
    """Shape x by a spectrum, at rms 1."""
    return unit(filtered(x, lambda hz: amp(along(spectrum, hz))))


def resonated(x, peaks):
    """Let x ring in a few resonances of alternating sign, at rms 1."""
    def response(f):
        """Sum of simple resonances, each with a centre and a width."""
        return sum((-1) ** k * amp(db) * 1j * f * width / (centre * centre - f * f + 1j * f * width)
                   for k, (centre, width, db) in enumerate(peaks))
    return unit(filtered(x, response))


def causal(spectrum, size=1024):
    """The sharpest impulse response that has this spectrum (minimum phase)."""
    cepstrum = irfft(np.log(amp(along(spectrum, np.fft.rfftfreq(size, 1 / SR)))))
    cepstrum[1:size // 2] *= 2
    cepstrum[size // 2 + 1:] = 0
    return irfft(np.exp(rfft(cepstrum)))


def add(track, s, sound):
    """Mix a sound into a track from time s."""
    part = track[..., round(s * SR):][..., :sound.shape[-1]]
    part += sound[..., :part.shape[-1]]


def scene():
    """Knocks, thuds and friction on the counter, their echoes and the room's own noise."""
    knocks, echo = contacts()
    soft = thuds() + strokes() + squeak() + squeals() + slide()
    soft_echo = room(soft, wet_db=-9.5)[:, :N]
    return placed(knocks + soft) + echo + soft_echo + background()


def record(dry, hardness=5):
    """Round off peaks towards a ceiling of 2.2, then keep nothing above the band limit."""
    rounded = dry / (1 + np.abs(dry / 2.2) ** hardness) ** (1 / hardness)
    return filtered(rounded, lambda hz: hz < TOP_HZ)


dry = scene()
out = record(dry)
materialize(out)
```